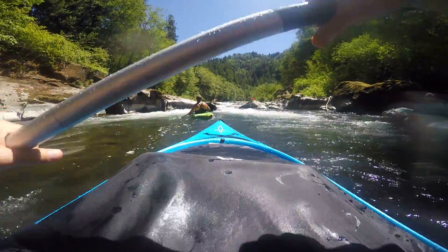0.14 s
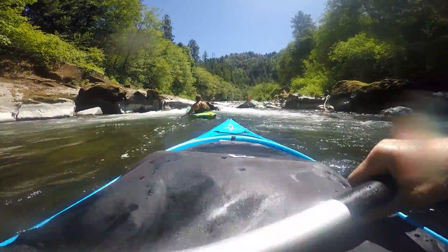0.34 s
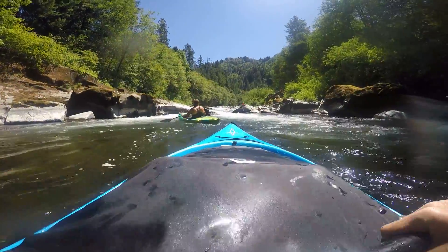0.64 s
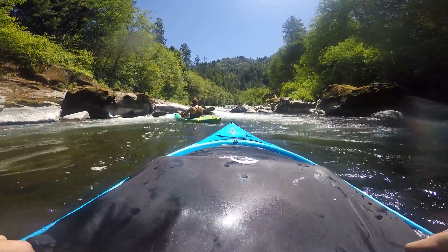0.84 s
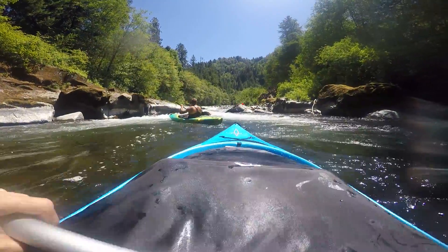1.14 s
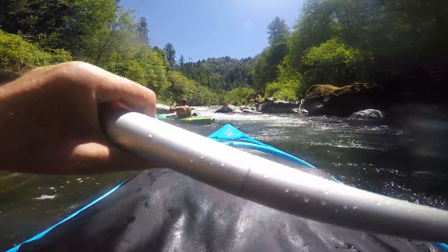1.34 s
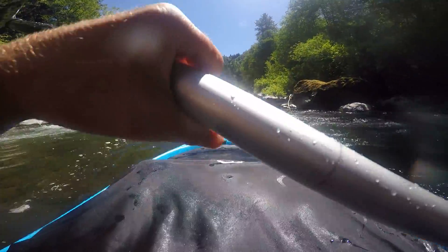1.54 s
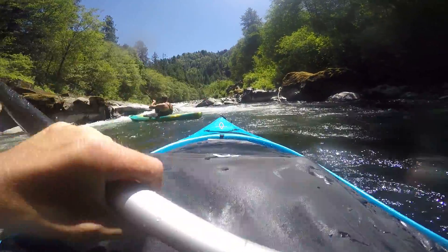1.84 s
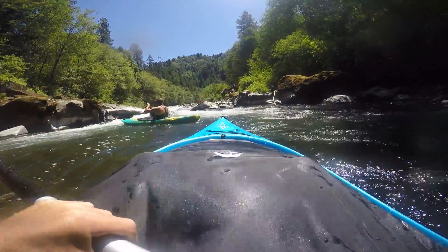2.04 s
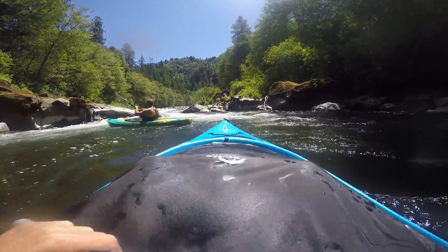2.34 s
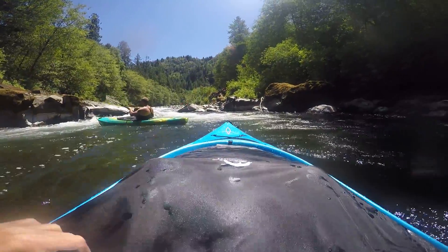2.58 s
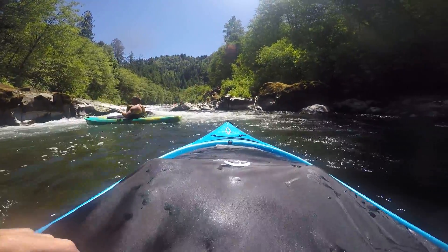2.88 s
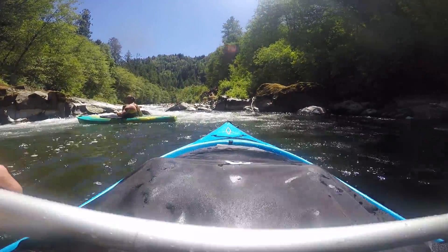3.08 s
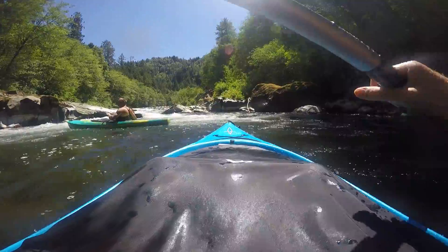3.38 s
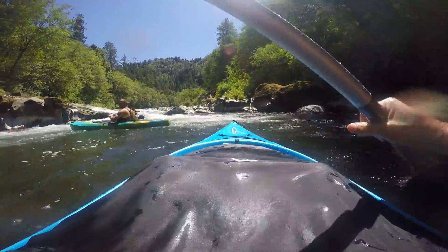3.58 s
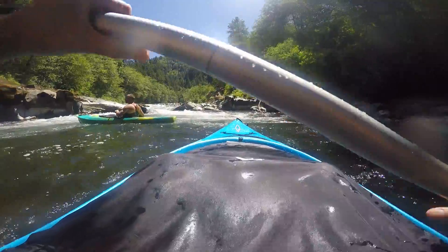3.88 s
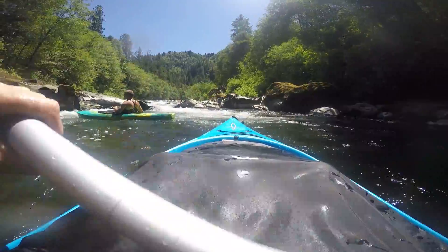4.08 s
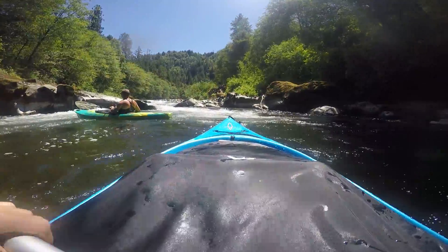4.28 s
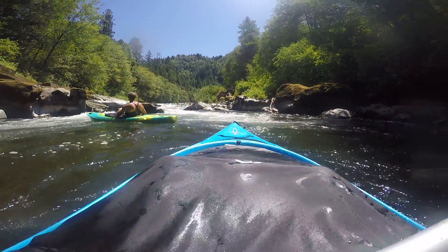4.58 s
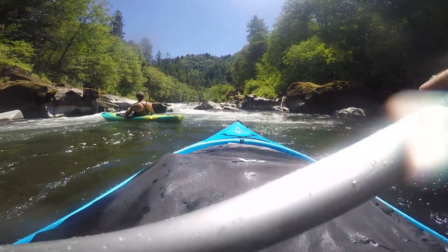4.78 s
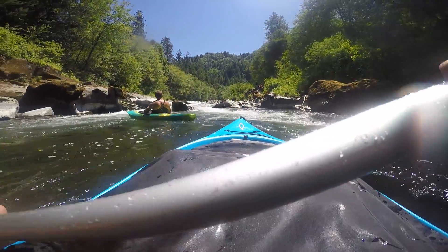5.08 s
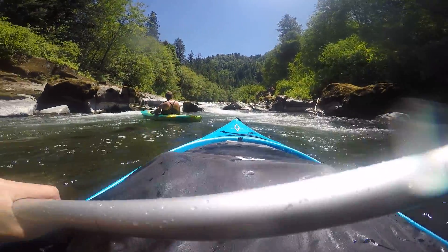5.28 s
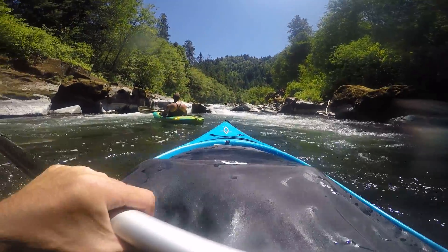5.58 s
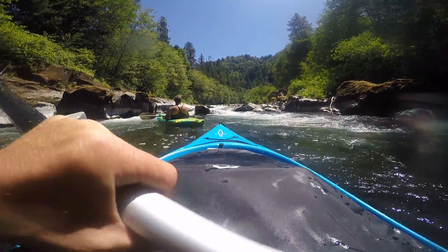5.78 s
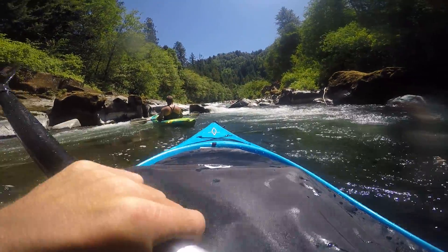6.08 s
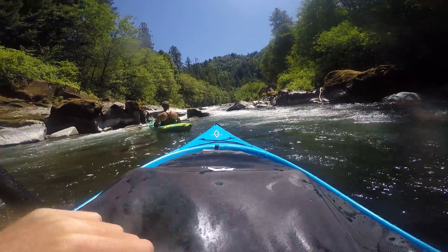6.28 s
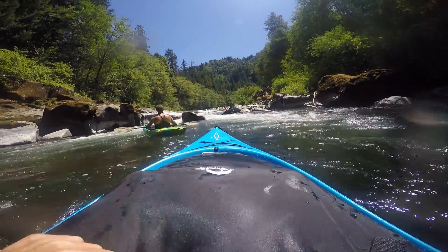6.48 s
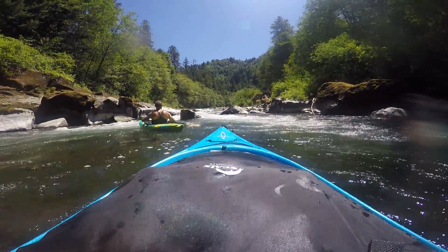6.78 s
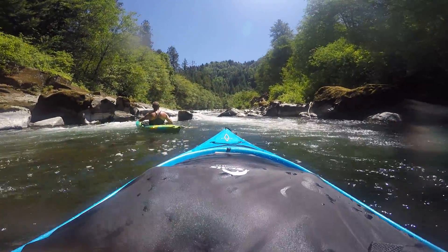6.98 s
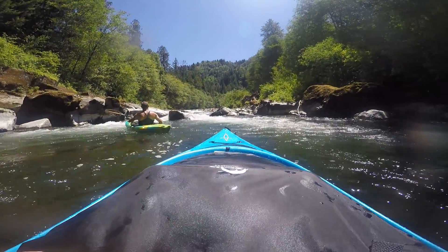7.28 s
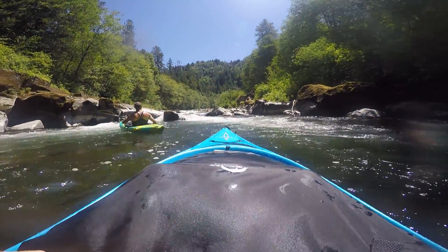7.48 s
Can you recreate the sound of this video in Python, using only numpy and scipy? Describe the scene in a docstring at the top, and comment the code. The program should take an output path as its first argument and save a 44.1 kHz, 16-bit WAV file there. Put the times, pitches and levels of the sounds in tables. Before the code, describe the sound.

River rapids rush and fizz steadily around a kayak, heard outdoors from a microphone on the paddler's chest. Wind rumbles low over a quick, very deep heartbeat-like throb. The paddle splashes at the start and the water eases slightly. About halfway, a gulp and a gust come with a hard, dull bump on the boat. A few drops tick, then a run of softer bumps and splashes comes near the end.

```python
"""A kayak drifts toward rapids, heard from a waterproof camera on the paddler's chest. From the start
the river roars and fizzes with bubbles over wind rumble, a faint sensor whine and a quick, thudding pulse.
Paddle and hull splash in the first half second, then the roar eases. Just past 4 s the water gulps, a gust
swells and the hardest bump rings the mount. Drops tick on the case after 5 s, and from about 6 s a run
of bumps comes through, with more splashes and two sheets of spray."""
import sys
import numpy as np
from scipy import signal
from scipy.fft import rfft, irfft
from scipy.io import wavfile
from scipy.ndimage import uniform_filter1d

SR = 44100
rng = np.random.default_rng(int(sys.argv[2]) if len(sys.argv) > 2 else 0)


def bounce(signal):
    """Save signal as a 16-bit WAV file at the path given by the first command-line argument."""
    frames = np.transpose(np.atleast_2d(signal))
    limited = np.clip(frames, -1, 1)
    pcm = np.round(limited * 32767).astype(np.int16)
    wavfile.write(sys.argv[1], SR, pcm)


N = 336483
T = np.arange(N) / SR
FREQS = np.fft.rfftfreq(N, 1 / SR)


def gain_of(db):
    """Decibels to amplitude."""
    return 10 ** (np.asarray(db) / 20)


def unit_rms(x):
    """Scales to rms 1."""
    return x / np.sqrt(np.mean(x ** 2) + 1e-20)


def band_rms(x, lo_hz, hi_hz):
    """Rms of the part of x between two frequencies."""
    return np.std(irfft(rfft(x) * ((FREQS > lo_hz) & (FREQS < hi_hz)), N))


def spectrum_at(points, hz):
    """Reads a tone curve on a log-frequency axis."""
    point_hz, db = np.transpose(points)
    return np.interp(np.log(hz + 1), np.log(point_hz), db)


def bell_eq(x, bells):
    """Imprints bell-shaped peaks and hollows on a sound."""
    curve_db = sum(db * np.exp(-(2 * (FREQS - hz) / width) ** 2) for hz, width, db in bells)
    return irfft(rfft(x) * gain_of(curve_db), N)


def automation(rows, t):
    """Every lane of an automation table at the times t."""
    times, *lanes = np.transpose(rows)
    return [np.interp(t, times, lane) for lane in lanes]


def wander(t, max_hz, count=24):
    """A slow random swell of rms 1."""
    rates = np.geomspace(max_hz / 10, max_hz, count)
    return unit_rms(sum(np.sin(2 * np.pi * (rate * t + rng.random())) for rate in rates))


def add(mix, s, sound):
    """Mixes a sound in at s seconds."""
    part = mix[max(round(s * SR), 0):][:len(sound)]
    part += sound[:len(part)]


# Fader rides as the boat drifts: (time [s], roar level [dB], foam level [dB])
RIVER_RIDES = [(0.0, -50.5, -51.5), (0.48, -52, -52.5), (0.85, -54.5, -54.5), (1.3, -54.5, -56.5),
               (2.95, -52.5, -56), (3.45, -53.5, -56.5), (4.2, -52.0, -54), (4.8, -53.5, -55.5),
               (5.25, -51.5, -52.5), (6.0, -52, -51.5), (7.08, -53, -53.5), (7.63, -52, -53)]
# Sheets of spray thrown up close by: (centre time [s], length [s], boost [dB])
SPRAY_SHEETS = [(.08, .8, 2), (4.52, 0.33, 3), (6.567, 0.29, 3.5), (6.918, 0.28, 2.5)]


def water_levels(t):
    """Roar, foam and spray rides in dB: spray rises with the foam and swells with each sheet."""
    roar_db, foam_db = automation(RIVER_RIDES, t)
    sheets_db = sum(db * np.cos(np.pi * np.clip((t - s) / length, -.5, .5)) ** 2
                    for s, length, db in SPRAY_SHEETS)
    spray_db = -69 + 0.39 * (foam_db - foam_db.mean()) + sheets_db
    return roar_db, foam_db, spray_db


# Comb colour of the echo off the deck: (frequency [Hz], width [Hz], gain [dB])
DECK_EQ = [(1008, 125, 3), (1133, 199, -8.5), (1505, 360, 4.5)]
# Arm and paddle block that echo: (time [s], share blocked [0-1])
DECK_SHADE = [(.5, 0.17), (.9, 0.1), (5.3, 0), (5.7, 0.4), (6.5, 0.7), (6.8, 0.03)]
# Boxy tone of the camera case: (frequency [Hz], width [Hz], gain [dB])
CASE_EQ = [(564.6, 64, -8), (640, 28, 0), (1838, 580, -4), (2190, 320, 1.65), (2555, 110, -3),
           (2830, 190, 1.5), (3233, 240, -5), (3990, 370, -2.5), (4510, 460, 1.5), (5580, 940, -2),
           (8670, 910, 2)]


def deck_and_case(x):
    """The deck's echo, unless blocked, and the waterproof case colour the river."""
    shade = automation(DECK_SHADE, T)[0]
    echoed = shade * x + (1 - shade) * bell_eq(x, DECK_EQ)
    return bell_eq(echoed, CASE_EQ)


# Tone of the river bed track: (frequency [Hz], relative level [dB])
ROAR_TONE = [(60, -23), (230, -1.5), (400, -5.5), (1000, -5.5), (2700, -8.5), (3600, -18), (5000, -21.5),
             (7500, -28.5), (11000, -34), (13500, -32.5), (15200, -39)]


def rapids(patchy_db=1.0, flicker_db=0.26, surge_db=0.27, foam_hz=1750, spray_hz=6000, trim_db=-0.41):
    """Countless far bubbles merge into a roar that surges in patches and brightens with foam and spray."""
    frame, hop = 1024, 256
    t = np.arange(N // hop + 5) * hop / SR
    hz = np.fft.rfftfreq(frame, 1 / SR)
    real, imag, patches = rng.standard_normal((3, len(t), len(hz)))
    patches = uniform_filter1d(patches, size=12, axis=0)  # smear in time
    patches = unit_rms(uniform_filter1d(patches, size=10, axis=1))  # and in frequency
    flicker = unit_rms(uniform_filter1d(rng.standard_normal(len(t)), size=5))
    roar_db, foam_db, spray_db = (db - db.mean() for db in water_levels(t))
    foam_shelf, spray_shelf = (hz ** 8 / (hz ** 8 + edge ** 8) for edge in (foam_hz, spray_hz))
    tone_db = spectrum_at(ROAR_TONE, hz) + patchy_db * patches + flicker_db * flicker[:, None]
    tone_db += np.outer(foam_db - roar_db, foam_shelf - spray_shelf)
    tone_db += np.outer(spray_db - roar_db, spray_shelf)
    spectra = (real + 1j * imag) * gain_of(tone_db)
    _, roar = signal.istft(spectra.T, nperseg=frame, noverlap=frame - hop)
    roar = deck_and_case(roar[:N])
    roar /= band_rms(roar, 600, 1700)  # the mids set the level
    surges = np.interp(T, t, wander(t, max_hz=5))
    return roar * gain_of(automation(RIVER_RIDES, T)[0] + surge_db * surges + trim_db)


def bubble(hz, cycles, rise=0.043):
    """A ringing pocket of air whose pitch climbs as it dies away."""
    age = np.arange(int(4 * cycles / hz * SR) + 2) * hz / SR / cycles  # in decay times
    chirp = np.sin(2 * np.pi * cycles * age * (1 + rise * age / 2))
    return chirp * np.exp(-age) * (1 - np.exp(-age * cycles * 2))


def fizz(lo_hz, hi_hz, per_s, cycles, spread_db, pitches=32):
    """Bubbles of many sizes burst at random; a few pop out much louder than the rest."""
    out = np.zeros(N)
    for hz in np.geomspace(lo_hz, hi_hz, pitches):
        strength = gain_of(spread_db * np.minimum(rng.exponential(1, N), 4))
        bursts = strength * (rng.random(N) < per_s / pitches / SR)
        out += signal.oaconvolve(bursts, bubble(hz, cycles))[:N]
    return unit_rms(out)


def near_water():
    """Single bubbles stand out beside the hull: low gurgle, bright foam and fine spray."""
    roar_db, foam_db, spray_db = water_levels(T)
    gurgle = fizz(278, 1510, per_s=98, cycles=4.8, spread_db=2.5) * gain_of(roar_db - 9.5)
    foam = fizz(1490, 4900, per_s=290, cycles=4.7, spread_db=3.5) * gain_of(foam_db - 11)
    spray = fizz(5140, 10500, per_s=500, cycles=3.5, spread_db=6) * gain_of(spray_db - 8.5)
    return deck_and_case(gurgle + foam + spray)


# Fader ride of the breeze: (time [s], level [dB])
WIND_RIDE = [(0.0, -46), (1.1, -46.5), (1.7, -50), (2.0, -46), (2.6, -50.5), (3.85, -49.5), (4.3, -42.5),
             (5.15, -51), (5.7, -45), (6.9, -43.5), (7.25, -53.0), (7.63, -51.5)]
# Sub-heavy tone of wind on the microphone: (frequency [Hz], relative level [dB])
WIND_TONE = [(10, 6), (22, -1), (35, 6.5), (55, 2), (80, -6.5), (118, -6), (160, -12), (240, -24.5),
             (400, -34), (1000, -74)]


def wind(gust_db=2, trim_db=-0.46):
    """Eddies buffet the case, swelling and dropping with each random gust."""
    eddies = irfft(rfft(rng.standard_normal(N)) * gain_of(spectrum_at(WIND_TONE, FREQS)), N)
    eddies /= band_rms(eddies, 75, 220)  # the upper bass sets the level
    gusts = wander(T, max_hz=5)
    return eddies * gain_of(automation(WIND_RIDE, T)[0] + gust_db * gusts + trim_db)


# The sensor's scan tone, then its octave: (rms level [dB])
WHINE_LEVELS = [-79.5, -72.5]


def sensor_whine(scan_hz=6307, sweeps_per_s=29.97):
    """The camera's sensor sings thinly as it scans its lines, retriggering with every sweep."""
    phase = 2 * np.pi * scan_hz * (T % (1 / sweeps_per_s))
    return sum(np.sqrt(2) * gain_of(db) * np.sin(k * phase) for k, db in enumerate(WHINE_LEVELS, 1))


# Sub thuds of the paddler's pulse: (centre time [s], level [dB])
PULSE_CUES = [(0.136, -20.5), (0.669, -25.5), (1.237, -20.5), (1.762, -21), (2.301, -22), (2.84, -18.5),
              (3.404, -23.5), (3.993, -22.5), (4.574, -23.5), (5.158, -24.5), (5.761, -21), (6.373, -17.5),
              (6.925, -18.5), (7.517, -22.5)]


def heartbeat(length_s=0.165, swing_hz=29.5, hz_per_db=0.5, overtone=0.19, unevenness=0.15):
    """Each beat rocks the camera on the chest for a few uneven swings; stronger beats swing faster."""
    out = np.zeros(N)
    t = np.arange(-length_s / 2, length_s / 2, 1 / SR)
    mean_db = np.mean([db for _, db in PULSE_CUES])
    for s, db in PULSE_CUES:
        hz = swing_hz + hz_per_db * (db - mean_db)
        start, *lags = rng.standard_normal(9)
        wobble = np.interp(t, np.linspace(t[0], t[-1], len(lags)), lags)
        phase = 2 * np.pi * (hz * t + start + unevenness * wobble)
        envelope = gain_of(db) * np.cos(np.pi * t / length_s) ** 2
        add(out, s - length_s / 2, envelope * (np.sin(phase) + overtone * np.sin(2 * phase)))
    return out


# Solo bubbles: (time [s], level [dB], pitch [Hz], decay [cycles])
PLOP_CUES = [(.083, -30.5, 398, 2.6), (.338, -52, 4370, 14), (.347, -39, 2030, 15), (4.048, -37, 330, 5.9),
             (4.167, -26.5, 212.5, 2.3), (4.401, -34, 2570, 9.7), (4.647, -40.5, 2270, 11),
             (6.868, -26.5, 240, 2.66)]


def plops():
    """Single pockets of trapped air ring out, from low gulps to high plinks."""
    out = np.zeros(N)
    for s, db, hz, cycles in PLOP_CUES:
        add(out, s, gain_of(db) * bubble(hz, cycles, rise=0.015))
    return out


# Splashes and laps: (time [s], rms level [dB], pitch [Hz], spread either way [octaves], length [s])
SPLASH_CUES = [(0.144, -47, 377, .3, .04), (.3, -57.5, 2750, 0.81, .11), (0.419, -51.5, 1000, 0.84, .11),
               (.44, -46.5, 250, 0.86, .08), (1.93, -48.5, 169, 0.58, .14),
               (4.125, -47.5, 3100, 0.48, .007), (4.158, -48, 654, 0.48, .018),
               (5.21, -51.5, 1400, .2, .08), (5.6, -49, 210, 0.48, .2), (6.422, -49, 680, 0.51, 0.078),
               (6.45, -53.5, 1900, .9, .08)]


def splashes(bubble_count=60):
    """Blade and hull fold air into the water as clouds of short-lived bubbles."""
    out = np.zeros(N)
    for s, db, hz, octaves, length in SPLASH_CUES:
        cloud = np.zeros(SR // 2)
        for when, detune, strength in rng.random((bubble_count, 3)):
            bubble_hz = hz * 2 ** (octaves * (2 * detune - 1))
            add(cloud, when * length, (0.18 + strength) * bubble(bubble_hz, cycles=1.9))
        cloud_rms = np.sqrt(np.sum(cloud ** 2) / (length * SR))
        add(out, s, gain_of(db) * cloud / cloud_rms)
    return out


# Knocks through the boat, plus one low thud at 6.37 s that deepens the pulse beat there: (time [s], peak level
# [dB], hardness as high cut [Hz])
BUMP_CUES = [(0.157, -32, 220), (1.11, -29, 89), (4.137, -33, 130), (4.169, -24, 410), (4.392, -11.5, 85),
             (4.409, -17.5, 80), (5.933, -26.5, 99), (6.232, -27, 232), (6.37, -22.5, 59.6),
             (6.445, -27.5, 193), (6.683, -24, 168), (6.869, -23.5, 360), (7.108, -25.5, 80)]
# Resonances of the camera mount: (frequency [Hz], relative level [dB], time to fall 60 dB [s])
MOUNT_MODES = [(36.5, -4, 0.26), (67.5, -6, 0.088), (127, 0, 0.052), (201, -8.5, 0.06), (330, -26, 0.021)]


def bumps():
    """Soft blows ring the camera mount; harder ones reach its higher modes."""
    out = np.zeros(N)
    t = np.arange(SR // 3) / SR
    ring = sum(gain_of(db - 60 * t / t60) * np.sin(2 * np.pi * hz * t) for hz, db, t60 in MOUNT_MODES)
    for s, db, top_hz in BUMP_CUES:
        band = signal.butter(2, [top_hz / 6, top_hz], "bandpass", fs=SR, output="sos")
        thud = signal.sosfilt(band, ring)
        add(out, s, gain_of(db) * thud / abs(thud).max())
    return out


# Drops ticking on the case: (time [s], peak level [dB], pitch [Hz])
DROP_CUES = [(.2215, -49, 7500), (3.6402, -45, 8300), (3.7435, -52, 6800), (5.0366, -44.5, 7300),
             (5.1054, -53, 6800), (5.3296, -44, 7300), (5.4725, -51, 11500), (5.482, -44, 6200),
             (5.484, -41, 3700), (7.0809, -52, 8500)]


def drops(decay_s=0.0019, band_ratio=1.2):
    """Each drop is a tiny spatter that rings the wet plastic for a moment."""
    out = np.zeros(N)
    t = np.arange(SR // 40) / SR
    for s, db, hz in DROP_CUES:
        spatter = rng.standard_normal(len(t)) * np.exp(-t / decay_s)
        band = signal.butter(2, [hz / band_ratio, hz * band_ratio], "bandpass", fs=SR, output="sos")
        tick = signal.sosfilt(band, spatter)
        add(out, s, gain_of(db) * tick / abs(tick).max())
    return out


def scene():
    """The mono mix: water and wind through the air, thuds through the mount, and the sensor's whine."""
    water = rapids() + near_water() + plops() + splashes() + drops()
    return (water + wind() + heartbeat() + bumps() + sensor_whine())[None]


def record(dry, cutoff_hz=15250):
    """The camera's steep high cut takes off the very top."""
    high_cut = signal.firwin(511, cutoff_hz, window=("kaiser", 9), fs=SR)
    return signal.oaconvolve(dry, high_cut[None], "same")


dry = scene()
out = record(dry)
bounce(out)
```